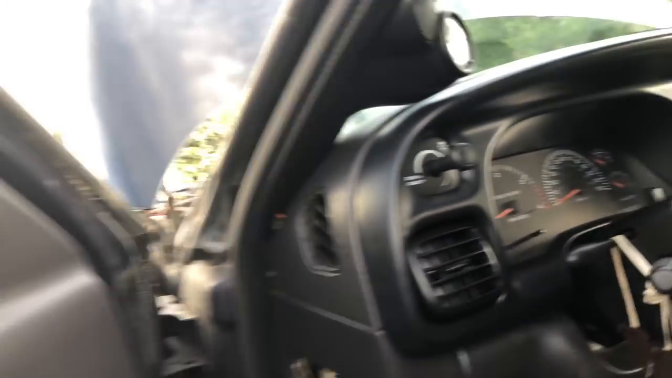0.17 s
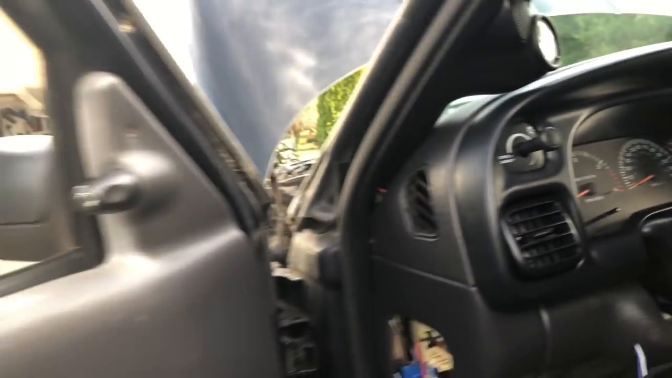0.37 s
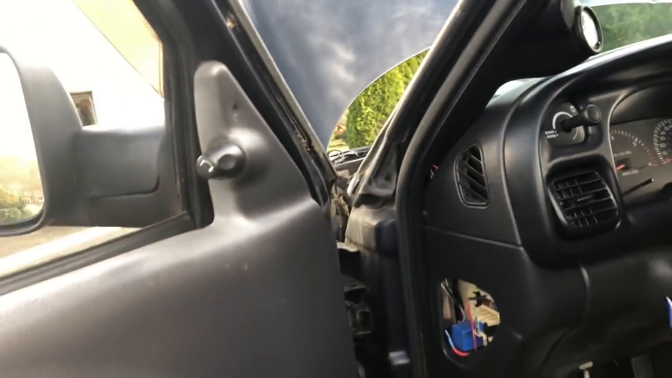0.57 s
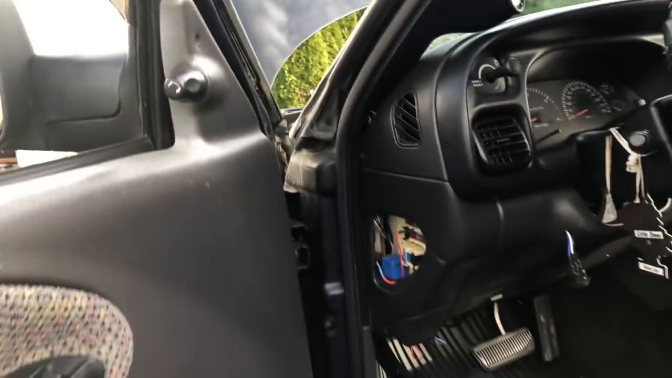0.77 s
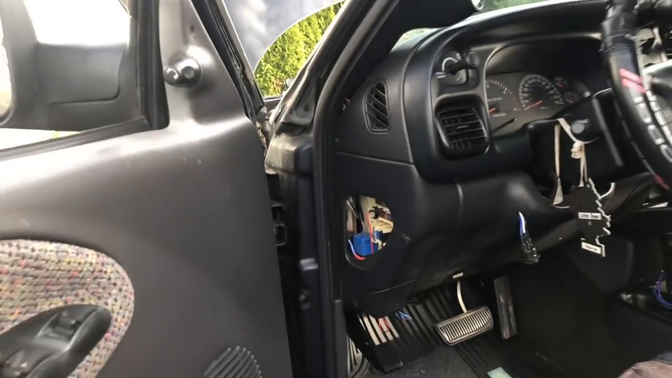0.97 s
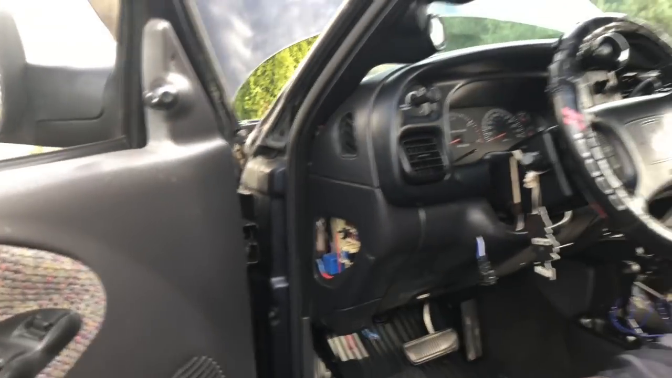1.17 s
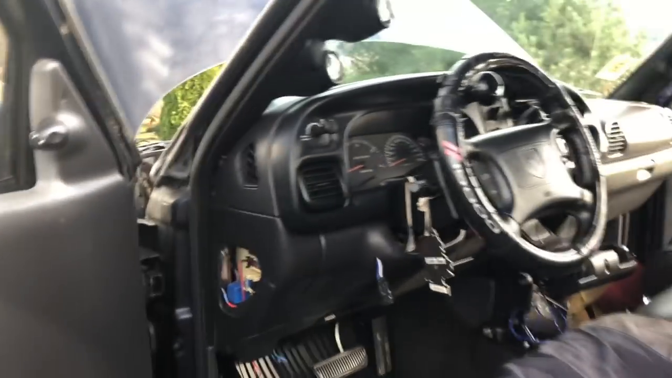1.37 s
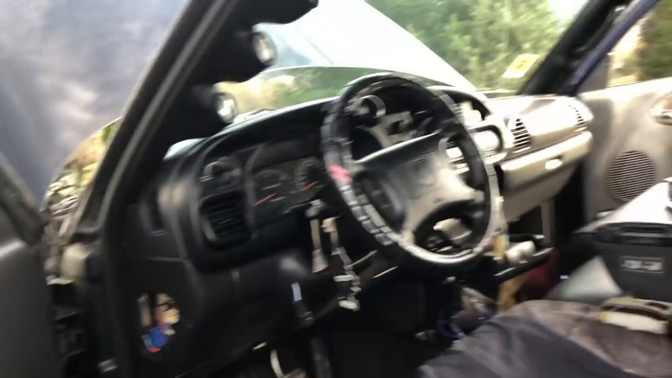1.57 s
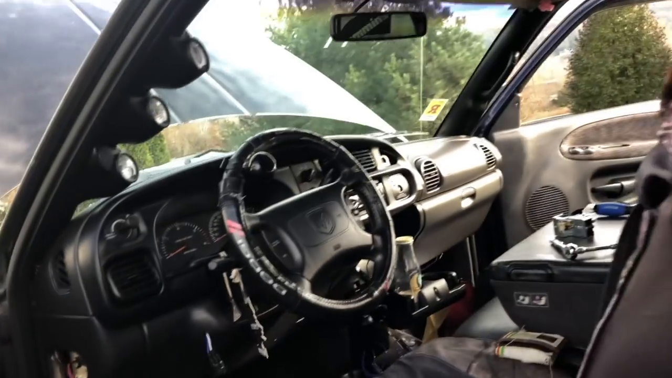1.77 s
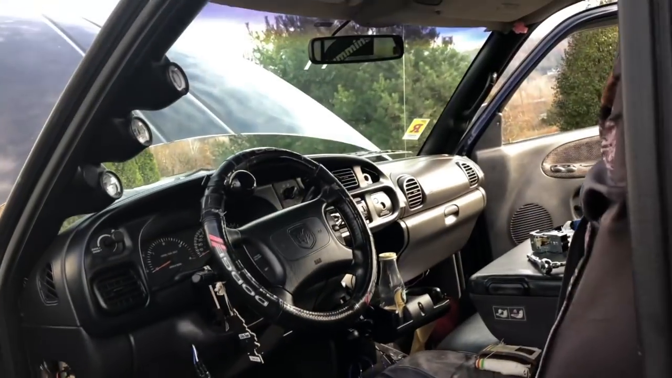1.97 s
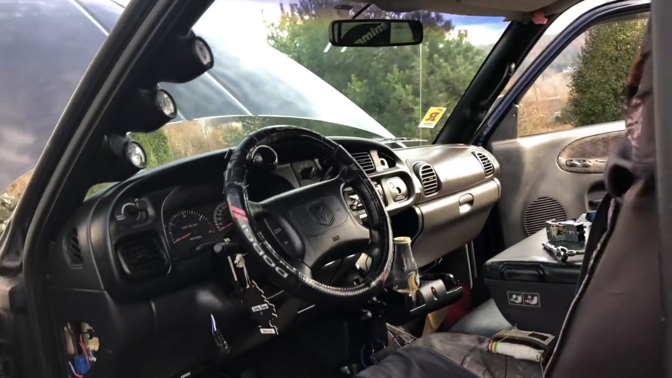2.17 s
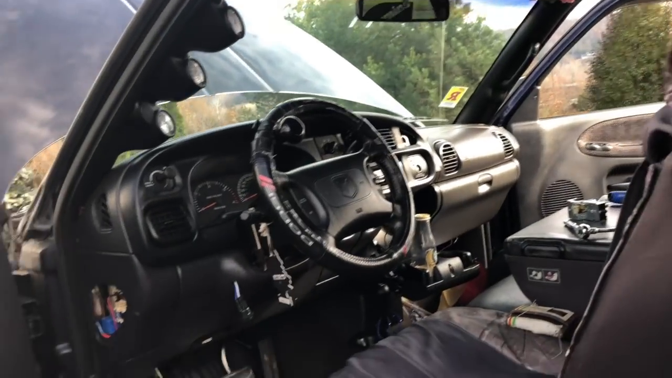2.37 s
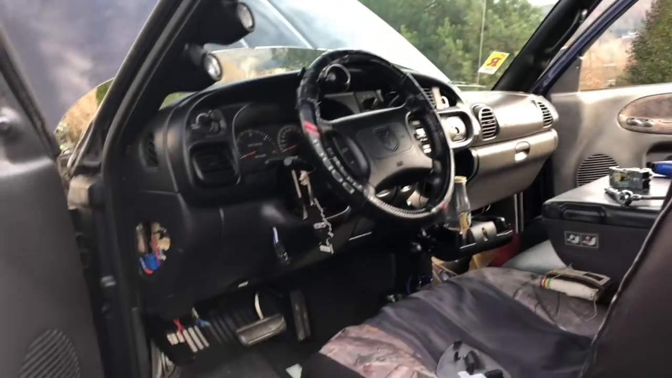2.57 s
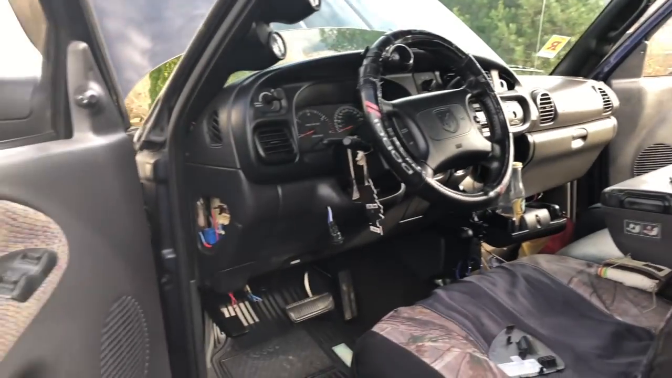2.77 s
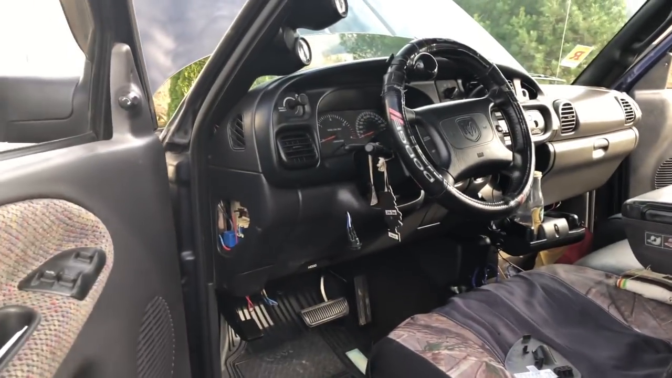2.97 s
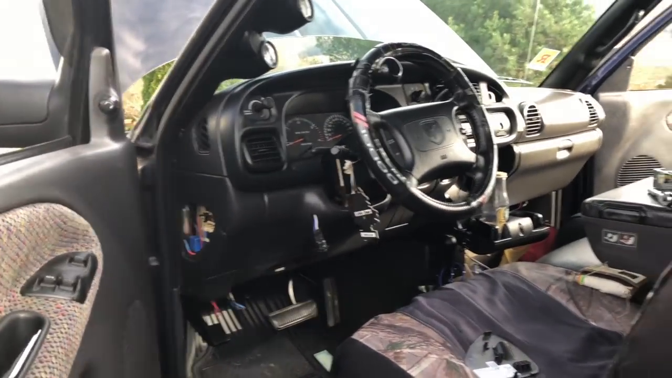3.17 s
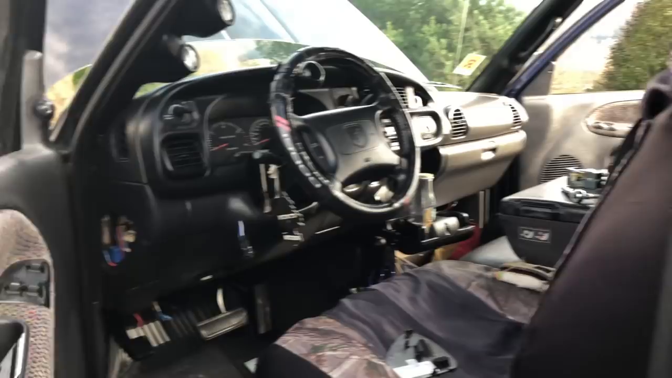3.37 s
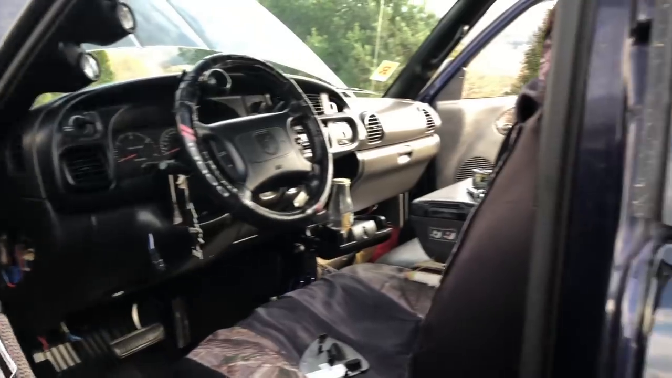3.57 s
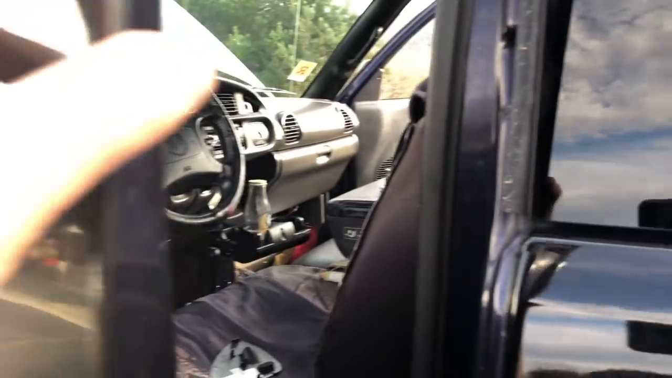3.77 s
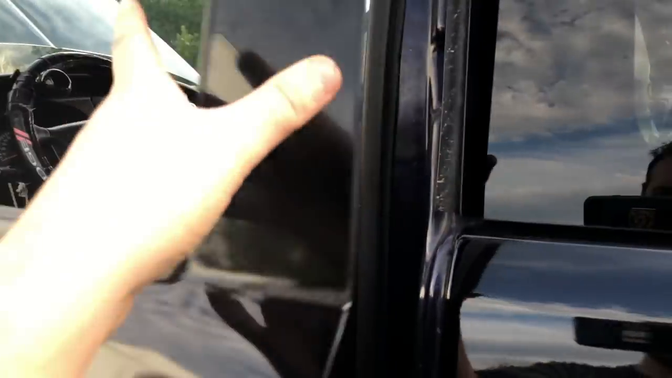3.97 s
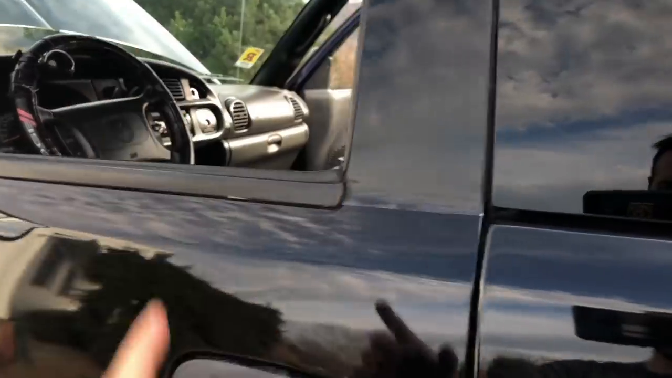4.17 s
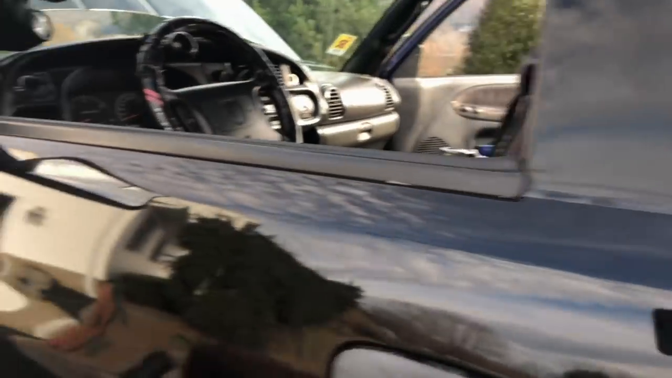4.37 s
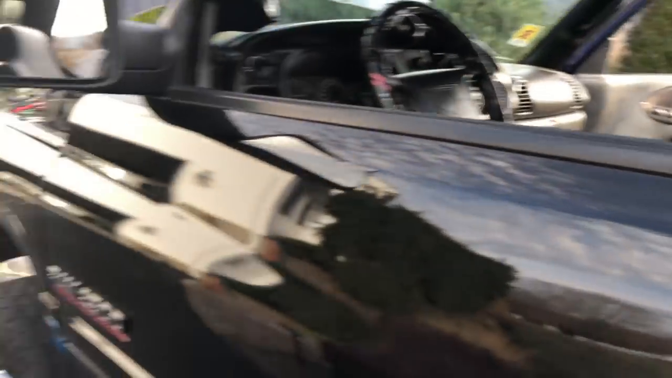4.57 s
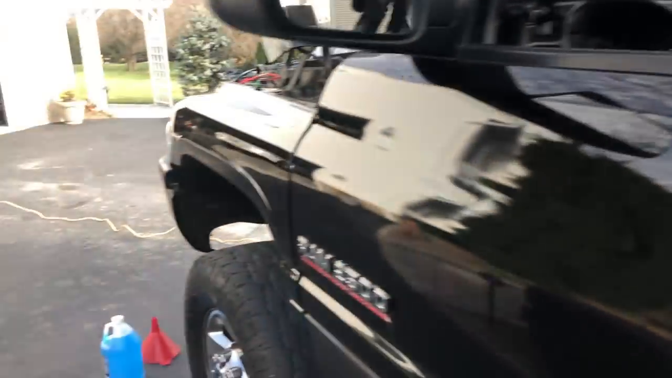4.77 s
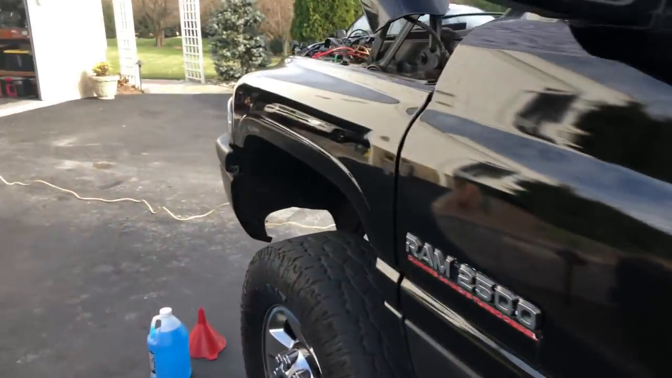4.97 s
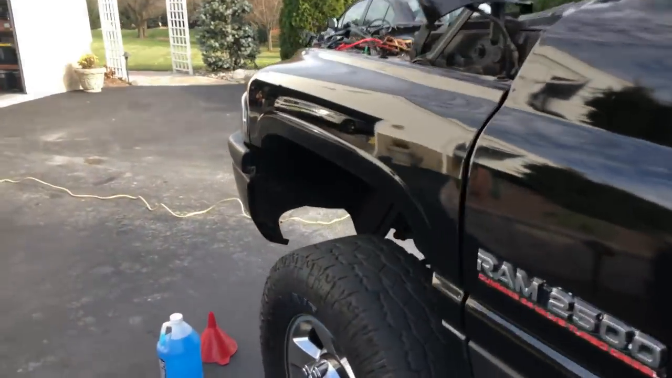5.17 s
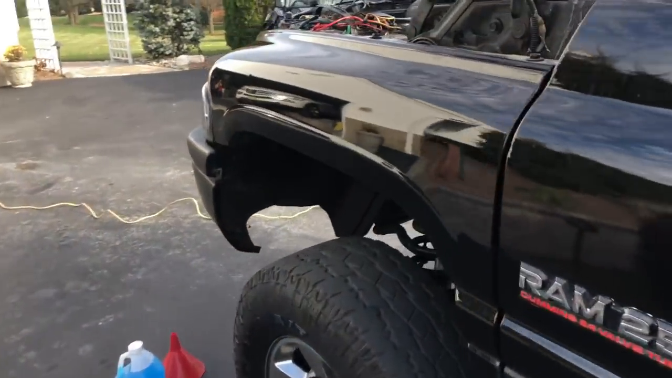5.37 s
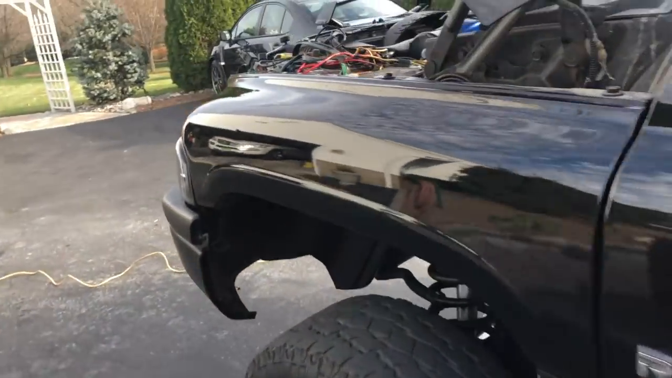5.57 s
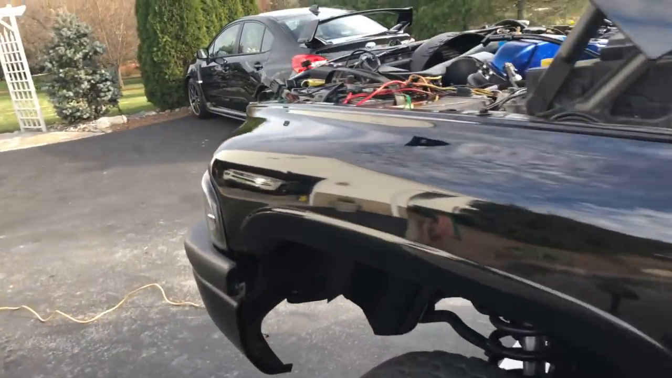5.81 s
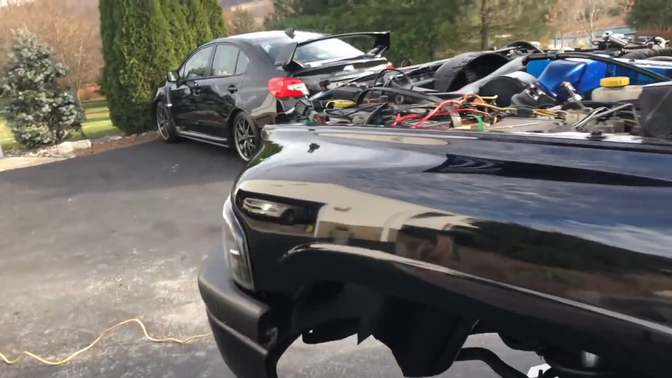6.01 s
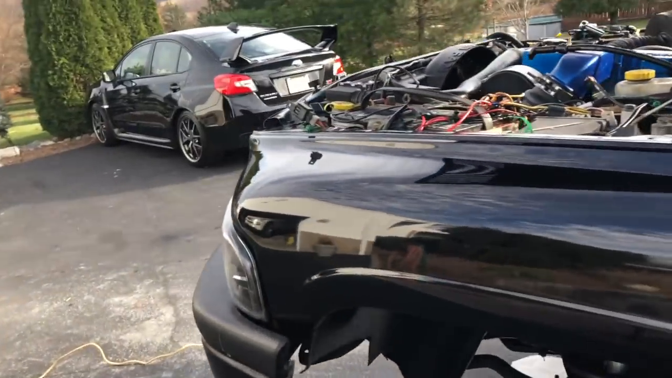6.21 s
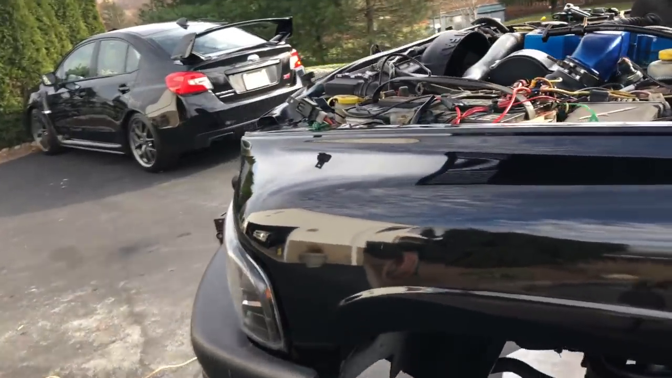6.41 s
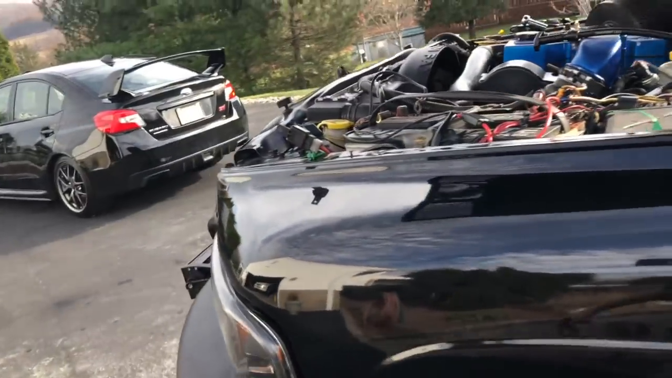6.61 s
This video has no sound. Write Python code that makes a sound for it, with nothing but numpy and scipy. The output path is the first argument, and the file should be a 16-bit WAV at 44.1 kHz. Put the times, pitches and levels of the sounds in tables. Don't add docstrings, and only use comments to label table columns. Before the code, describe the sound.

In a quiet yard, soft thumps, scuffs and tiny metal ticks by an open vehicle door, then one loud heavy slam and a distant motor hum.

```python
import sys
import numpy as np
from scipy import signal
from scipy.io import wavfile
from scipy.ndimage import uniform_filter1d, minimum_filter1d

SR = 44100
rng = np.random.default_rng(int(sys.argv[2]) if len(sys.argv) > 2 else 0)


def store_pcm(level_fs):
    pcm = np.round(np.clip(level_fs, -1, 1) * 32767).astype(np.int16)
    wavfile.write(sys.argv[1], SR, np.atleast_2d(pcm).T)


def boost(x):
    u = np.asarray(x, float) / 20
    return 10 ** u


N = 293132
SHUT_S = 4.188
SLAM_FIRST, SLAM_SIZE = round(4.1 * SR), round(.6 * SR)
SLAM = slice(SLAM_FIRST, SLAM_FIRST + SLAM_SIZE)


def rms_one(x):
    return x / np.sqrt(np.mean(x ** 2) + 1e-20)


def in_time(rows, outside=None):
    s, *columns = np.transpose(rows)
    return [np.interp(np.arange(N) / SR, s, c, outside, outside) for c in columns]


def drift(rate):
    r = np.exp(-80 * np.pi * rate / SR)
    slow = signal.lfilter([1], [1, -2 * r, r * r], rng.standard_normal(N // 40 + 2002))[2000:]
    return np.interp(np.arange(N) / 40, np.arange(len(slow)), rms_one(slow))


def resonate(x, hz, width_hz):
    r = np.exp(-np.pi * width_hz / SR)
    top = np.array([1, 0, -1]) * (1 - r * r) / 2
    return signal.lfilter(top, [1, -2 * r * np.cos(2 * np.pi * hz / SR), r * r], x)


def colour(pair, spectrum, patchy_db=0.):
    hz, level_db = np.transpose(spectrum)
    edges = hz[0] * 2 ** np.arange(0, np.log2(hz[-1] / hz[0]) + .4, .5)
    out = 0
    for k, (low, high) in enumerate(zip(edges, np.minimum(edges[1:], .45 * SR))):
        band = signal.sosfilt(signal.butter(2, [low, high], "band", fs=SR, output="sos"), pair[k % 2])
        flicker = patchy_db * drift(14)[:pair.shape[1]] if patchy_db else 0
        middle_db = np.interp(np.log(low * high) / 2, np.log(hz), level_db)
        out = out + boost(middle_db + flicker) * band
    return rms_one(out)


def grains(size, per_s, spread_db):
    strength = boost(spread_db * np.minimum(rng.exponential(1, (2, size)), 4))
    strength = strength * rng.choice([-1, 1], (2, size))
    return strength * (rng.random((2, size)) < per_s / SR) + 1e-18


def add(out, s, db, x):
    i = round(s * SR)
    x = x[:N - i]
    out[i:i + len(x)] += boost(db) * x / np.max(np.abs(x))


def glide(from_hz, to_hz, size):
    return np.sin(2 * np.pi * np.cumsum(np.linspace(from_hz, to_hz, size)) / SR)


def humps(rows, rest_db):
    t = np.arange(N) / SR
    peaks = [db - 20 * np.abs(t - s) / fall_s for s, db, fall_s in rows]
    return np.max([t * 0 + rest_db] + peaks, axis=0)


def blow_shape(s, db, rise_s, hold_s, fall_db_s):
    age = np.arange(N) / SR - s
    level_db = db - 12 * np.clip(1 - age / rise_s, 0, 1) - fall_db_s * np.maximum(age - rise_s - hold_s, 0)
    return boost(level_db) * (age > 0)


def burst(t60, rise_s):
    t = np.arange(SR // 6) / SR
    return rng.standard_normal(len(t)) * boost(-60 * t / max(t60, .004)) * (1 - np.exp(-t / rise_s))


def ring(t60, rise_s, hz, width_hz, outer_width_hz):
    return resonate(resonate(burst(t60, rise_s), hz, width_hz), hz, outer_width_hz)


def rings(rows):
    out = np.zeros(N)
    for s, db, hz, width_hz, t60 in rows:
        add(out, s, db, ring(t60, 0.00054, hz, width_hz, 2 * width_hz))
    return out


def knocks(rows, contact_s, upper_db, push_db):
    out, t = np.zeros(N), np.arange(SR // 4) / SR
    chance = rng.random((len(rows), 4))
    for (s, db, hz, t60), ratios in zip(rows, chance):
        modes = np.sin(2 * np.pi * hz * t) * boost(-60 * t / t60)
        modes += boost(push_db) * np.sin(2 * np.pi * .55 * hz * t) * boost(-70 * t / t60)
        for k, share in enumerate(ratios):
            ratio = 1.3 + .5 * k + .4 * share
            upper = np.sin(2 * np.pi * hz * ratio * t) * boost(-60 * t * ratio / t60)
            modes += boost(upper_db * (k + 1.5)) * upper
        add(out, s, db, modes * (1 - np.exp(-t / contact_s)))
    return out


def hard_ticks(rows, t60):
    out = np.zeros(N)
    for s, db, hz, body_db, snap_db in rows:
        body = resonate(resonate(burst(1.515 * t60, 0.00043), 582, 520), 726, 620)
        snap = resonate(resonate(burst(0.793 * t60, 0.00036), 3300, 5700), 4100, 10000)
        add(out, s, db, ring(t60, 0.00024, hz, 0.269 * hz, 1.38 * hz))
        add(out, s, db + body_db, body)
        add(out, s, db + snap_db, snap)
    return out


# frequency in Hz, density in dB per Hz.
RUMBLE = [(15, -44), (25, -26), (49, -8), (123, 0.5), (170, -5), (211, -14), (248, -13), (277, -27),
          (500, -28), (650, -46.5), (1100, -120)]
# frequency in Hz, density in dB per Hz.
HISS = [(150, -39), (250, -5), (325, -15), (386, -7), (686, -16.5), (761, -13), (1470, -19.5),
        (6700, -37.5), (15200, -46.5), (16000, -45)]
# time in seconds, wind on the port in dB, seconds to fall 20 dB.
SWINGS = [(0.25, -49, 0.27), (0.63, -48.5, 0.01), (1.28, -49, 0.37), (1.44, -46, 0.3862), (1.7, -58, 0.47),
          (2.0, -54.5, 0.59), (2.24, -52.5, 0.44), (2.58, -59.5, 0.12), (2.9, -53.5, 0.73),
          (3.66, -62.5, 1), (4.08, -63, 0.48), (5.0, -63, 0.73), (6.3, -63, 3.0)]
# time in seconds, lift in dB, seconds to fall 20 dB.
STIRS = [
    (0.6, 3, 1.5),
    (1.55, 2.5, 3.5),
    (3.3, 2.5, 2),
    (4.1, 3, 1.5),
    (5.55, 2.5, 3.5),
    (6.1, 2, 3.5),
]


def yard():
    calm_db, rumble_db, hiss_db = -69, -63.5, -69
    rumble_follows, hiss_follows = .2, 0.0275
    wind_db = humps(SWINGS, calm_db)
    lift_db = wind_db - calm_db
    stir_db = humps(STIRS, 0)
    echo = blow_shape(SHUT_S, db=-47, rise_s=.17, hold_s=0, fall_db_s=68.5)
    push = blow_shape(SHUT_S, db=-39, rise_s=.012, hold_s=.09, fall_db_s=65)
    rumble = colour(rng.standard_normal((2, N)), RUMBLE, patchy_db=3.0)
    hiss = colour(rng.standard_normal((2, N)), HISS, patchy_db=1.5)
    wind = rms_one(resonate(resonate(rng.standard_normal(N), 52, 40), 52, 40))
    rumble_gain = boost(rumble_db + rumble_follows * lift_db) + echo
    hiss_gain = boost(hiss_db + hiss_follows * lift_db + stir_db) + boost(-18) * echo
    wind_gain = (boost(wind_db) + push) * boost(2.0 * drift(6))
    return boost(9) * rumble_gain * rumble + boost(4.5) * hiss_gain * hiss + wind_gain * wind


# time in seconds, motor in dB, fan in dB.
MOTOR = [(0.0, -57, -61), (0.53, -77, -70), (1.0, -62, -58.5), (1.41, -67, -61.5), (2.26, -66, -57.5),
         (2.54, -62.5, -52.5), (2.92, -67, -70), (3.2, -77, -79), (4.0, -61.5, -62), (4.4, -65.5, -50.5),
         (4.75, -64, -74.5), (5.0, -52, -54), (5.14, -50.5, -53.5), (5.5, -44.5, -49), (5.83, -47, -47.5),
         (6.09, -48.5, -54.5), (6.5, -45, -54), (6.65, -49, -53)]
# time in seconds, level in dB, seconds to fall 20 dB.
DRONES = [
    (1.0, -57.5, 0.43),
    (1.83, -66.5, 0.2),
    (3.25, -59.5, 1.03),
    (3.9, -63, 1),
    (4.5, -54.5, .6),
    (5.14, -53, 0.8547),
    (5.83, -52.5, 0.72),
    (6.4, -62.5, 0.5),
]


def motor():
    shaft_hz, fan_hz, third_order_db = 96.97, 126.72, -15
    shaft_db, fan_db = in_time(MOTOR)
    second_db = humps(DRONES, -79)
    turn = 2 * np.pi * np.cumsum(shaft_hz * (1 + .003 * drift(3))) / SR
    blade = 2 * np.pi * np.cumsum(fan_hz * (1 + 0.013 * drift(4))) / SR
    shaft = boost(shaft_db + 1.2 * drift(5)) * np.sin(turn)
    orders = np.sin(2 * turn) + boost(third_order_db) * np.sin(3 * turn)
    orders = boost(second_db + .8 * drift(5)) * orders
    fan = boost(fan_db + 1.0 * drift(7)) * np.sin(blade)
    return np.sqrt(2) * (shaft + orders + fan)


# frequency in Hz, width in Hz, level in dB against the shaft.
HOUSING = [(79, 4, -15), (158.4, 4, -21), (211, 5, -21), (252, 5, -26)]


def housing():
    shaft_db, _ = in_time(MOTOR)
    hum = 0
    for hz, width_hz, db in HOUSING:
        band = resonate(resonate(rng.standard_normal(N), hz, width_hz), hz, width_hz)
        hum = hum + boost(db) * rms_one(band)
    return boost(shaft_db) * hum


# start in seconds, peak in
# dB, pitch in Hz, t60 in seconds.
BUMPS = [
    (0.2965, -41, 200, .05),
    (1.2575, -41, 560, .04),
    (1.456, -49, 450, .08),
    (3.076, -41, 400, .14),
    (4.2585, -9, 235, .05),
    (4.1885, -18, 640, .03),
    (5.478, -56, 900, .04),
    (0.229, -33, 125, .12),
    (3.436, -43, 232, .35),
    (4.2775, -11, 195, .07),
]


def bumps():
    return knocks(BUMPS, contact_s=0.0012, upper_db=-16, push_db=-9)


# start in seconds, peak in dB, pitch in Hz, t60 in seconds.
THUMPS = [(0.2395, -36, 189, 0.08), (0.599, -39, 83.8, 0.128), (1.163, -42, 124.7, 0.118),
          (1.218, -45, 170.5, 0.13), (1.262, -29, 128, 0.11), (1.392, -40, 125.7, 0.12),
          (1.4025, -28.5, 158, 0.13), (2.049, -44, 116.6, 0.263), (2.141, -37, 119.2, 0.095),
          (2.698, -47, 157.6, 0.12), (2.998, -39, 254, 0.099), (3.021, -33, 230.8, 0.24),
          (3.0575, -27, 237, 0.1), (3.216, -39, 241.3, 0.102), (3.301, -47.5, 145, 0.15),
          (3.339, -42.5, 297.2, 0.155), (3.44, -48, 230, 0.15), (3.47, -47, 239.6, 0.182),
          (3.499, -49.5, 245.7, 0.14)]


def thumps():
    return knocks(THUMPS, contact_s=0.00341, upper_db=-2, push_db=-8.5)


# start, hardest point and end in seconds, level in dB,
# brightness in dB a band.
SCUFFS = [(0.403, .445, 0.497, -68.5, 2), (0.473, 0.481, 0.549, -69.5, 2),
          (0.49, 0.523, 0.586, -64.5, -2.5), (0.588, .63, 0.67, -72, 4.5),
          (0.762, 0.782, 0.82, -60.5, -2.5), (1.747, 1.81, 1.87, -71, -12.5),
          (1.843, 1.886, 1.931, -61.5, -7.5), (3.282, 3.341, 3.25, -72, -9.5),
          (3.404, 3.501, 3.62, -74, -3.5), (4.62, 4.731, 5.0, -79.5, 5), (5.84, 5.847, 5.93, -77.5, 3),
          (5.882, 5.893, 5.975, -60, 3), (5.98, 6.1, 6.36, -77.5, 3.5), (5.1, 5.2, 5.34, -86, 3),
          (6.444, 6.467, 6.48, -68, 3.5), (6.52, 6.58, 6.68, -75, 0.5)]
# frequency in Hz, width in Hz.
SOLE = [(700, 690), (2500, 1380), (5800, 3330), (11500, 12000)]
SOLE_DB = [-0.5, -0.5, -3, -4.5]


def scuffs():
    edge_db, end_db, lift_off_s = -10, -14.5, .018
    grit_grains = grains(N, 7000, 3.9) * boost(1.68 * drift(32))
    bands = []
    for k, (hz, width) in enumerate(SOLE):
        bands.append(rms_one(resonate(resonate(grit_grains[k % 2], hz, width), hz, 1.71 * width)))
    out = 0
    for start, top, end, db, bright_db in SCUFFS:
        stroke = [(start, edge_db), (top, 0), (end, end_db), (end + lift_off_s, 2 * end_db - 10.5)]
        stroke_db, = in_time(stroke, outside=-130)
        rub = sum(boost((k - 1) * bright_db + SOLE_DB[k]) * band for k, band in enumerate(bands))
        out = out + boost(db + stroke_db) * rub
    return out


# start in seconds, peak
# in dB, ring in Hz, width in Hz, t60 in seconds.
KEYS = [(0.4093, -59.5, 5140, 1500, .03), (0.4095, -66, 11000, 6000, 0.029),
        (0.4253, -61.5, 4660, 400, 0.051), (0.4422, -59, 7500, 700, 0.078), (0.47, -61.5, 5610, 250, 0.098),
        (0.4772, -60.5, 5770, 400, 0.124), (0.4772, -59, 8000, 600, .08),
        (0.4772, -62.5, 10560, 500, 0.048), (0.478, -65, 12250, 500, .14), (0.4775, -64.5, 4300, 400, .05),
        (0.5051, -57.5, 3340, 1200, 0.059), (0.506, -57, 1700, 900, .1), (0.53, -60, 1900, 900, .08),
        (0.5715, -44, 12000, 7000, .018), (0.578, -36.5, 13000, 6000, .022),
        (0.586, -35.5, 12500, 7000, 0.0205)]


def keys():
    return rings(KEYS)


# start in seconds, peak in dB, ring in Hz,
# dull body and bright snap in dB against the peak.
TICKS = [(0.5713, -33.5, 1590, -8.5, -2.5), (0.5779, -29.5, 1500, -11.5, 3), (0.5865, -29, 1500, -14, -2.5),
         (0.7706, -51.5, 1430, -7, -18.5), (0.7869, -44.5, 1400, -6, -19.5), (1.2595, -80, 1000, 20, -15),
         (1.4024, -70, 1500, 6, -16), (1.5945, -55.5, 1550, 3.5, -2.5), (1.6639, -50.5, 1280, -3.5, -5),
         (1.8545, -54, 2450, -10, -25.5), (1.883, -53, 2600, -11, -26), (1.923, -50, 2260, -14.5, -18),
         (2.061, -43.5, 1980, -8.5, -9), (2.55, -61.5, 1580, -0.5, -9.5), (3.012, -69.5, 1520, 12.5, -19.5),
         (3.057, -37.5, 1570, -2.5, -37), (3.0714, -49, 1320, 3.5, -29), (3.2142, -50.5, 1250, 7, -34),
         (3.3336, -64.5, 1390, 12, -16.5), (3.451, -58, 1200, -0.5, -18), (3.52, -54.5, 1300, -14.5, -14.5)]


def ticks():
    return hard_ticks(TICKS, t60=0.0325)


# start in seconds, peak in dB, ring in Hz, width in Hz,
# t60 in seconds.
CREAKS = [(0.6, -47.5, 397, 250, 0.108), (1.7943, -55.5, 1000, 500, .05), (1.819, -56.5, 900, 700, .025),
          (1.833, -57, 600, 400, 0.029), (1.855, -56.5, 950, 400, .04), (1.872, -57.5, 1000, 500, 0.048),
          (1.891, -55, 950, 300, .05), (1.945, -60.5, 800, 400, .04), (3.013, -45, 600, 400, 0.061),
          (3.021, -56.5, 1100, 250, .04), (3.075, -44.5, 550, 450, 0.18), (3.09, -59, 1500, 900, 0.15),
          (3.222, -51, 1150, 400, 0.086), (3.225, -50, 450, 300, 0.128), (3.303, -54, 1045, 250, .08),
          (3.303, -58, 1600, 600, 0.068), (3.336, -58.5, 2800, 400, .03), (3.338, -50.5, 523, 300, 0.127),
          (3.347, -56, 1000, 300, 0.081), (3.367, -52, 425, 250, .08), (3.404, -57.5, 800, 500, 0.09),
          (3.515, -58, 1400, 400, .08)]


def creaks():
    return rings(CREAKS)


# start and end in seconds, start and end pitch in Hz, level in dB.
SKIDS = [
    (1.845, 1.878, 2100, 3000, -53),
    (1.876, 1.915, 2400, 2150, -47.5),
    (1.85, 1.9, 5600, 5200, -62.5),
]


def skids():
    width_hz = 210
    out = np.zeros(N)
    for start, end, from_hz, to_hz, db in SKIDS:
        size = round((end - start) * SR)
        rough = resonate(rng.standard_normal(SR // 10), width_hz / 2, width_hz)[-size:]
        add(out, start, db, rough * glide(from_hz, to_hz, size) * np.hanning(size) ** 0.37)
    return out


# start and end in seconds, start and end pitch in Hz, level in dB.
SQUEAKS = [
    (1.88, 1.915, 2650, 2300, -66),
    (2.33, 2.75, 161, 158, -54),
    (4.57, 4.67, 1385, 1445, -64),
    (5.84, 6.2, 1222, 1212, -65),
    (4.325, 4.36, 13050, 12950, -48),
]


def squeaks():
    out = np.zeros(N)
    for start, end, from_hz, to_hz, db in SQUEAKS:
        size = round((end - start) * SR)
        swell = np.hanning(size) ** 0.27 * boost(1.22 * drift(25.2)[:size])
        add(out, start, db, glide(from_hz, to_hz, size) * swell)
    return out


# start in seconds, peak in dB,
# ring in Hz, width in Hz, t60 in seconds.
FLICKS = [(3.0585, -43, 2300, 700, .03), (3.0745, -52, 2300, 600, .04), (3.451, -65, 6300, 1500, .04),
          (3.505, -67, 5200, 2500, .1), (3.95, -66, 3500, 2500, .1), (4.02, -68, 6500, 3000, .06),
          (4.133, -45, 2800, 1800, .04), (4.176, -60, 5000, 5000, .05), (5.842, -62, 5800, 500, .06),
          (5.888, -51, 4200, 500, .05), (5.913, -55, 1300, 900, .04), (6.466, -58, 4600, 1200, .03),
          (5.29, -70, 12000, 5000, .02), (5.546, -62, 6500, 3000, .035), (4.262, -36, 12000, 6000, .35)]


def flicks():
    return rings(FLICKS)


# start in seconds, peak in dB, ring in Hz,
# dull body and bright snap in dB against the peak.
GRIT = [(3.95, -62, 1210, -1.5, 0.5), (4.03, -66, 1290, -2.5, 2.5), (4.856, -54, 1510, 12, -13.5),
        (5.4264, -51, 2040, 6, -10), (5.4694, -55.5, 1366, -7, -21), (5.545, -59.5, 1381, -5, 3.5),
        (5.8414, -63, 1219, -0.5, 3.5), (5.884, -40, 3536, -1.5, 2.5), (6.008, -37.5, 1820, 0, -14),
        (6.0217, -54, 1210, -1, -14.5), (6.4461, -46.5, 2530, -6, -6.5), (6.4653, -47.5, 2660, -5, -3)]


def grit():
    return hard_ticks(GRIT, t60=0.0429)


# start in seconds, peak in dB, t60 in seconds, ring in Hz,
# ring in dB against the peak.
LATCH = [(4.129, -45, 0.05, 5090, -5.5), (4.1905, -18.5, 0.0415, 3310, -0.5),
         (4.1994, -6, 0.0343, 3380, 0.5), (4.2052, -20, 0.04, 3560, -5), (4.2122, -13.5, 0.024, 3400, -2.5),
         (4.2185, -11, 0.0387, 3370, -2), (4.2556, -9.5, 0.048, 3300, -6), (4.2592, -19, 0.058, 2820, 2),
         (4.2973, -22, 0.044, 2610, -5), (4.344, -31, 0.039, 2570, -5), (4.3686, -46, 0.032, 2820, 1.5),
         (4.384, -33, 0.044, 3450, -0.5), (4.423, -46, 0.038, 6000, -3.5),
         (4.459, -45.5, 0.043, 4230, -2.5), (4.482, -39, 0.043, 2930, -6.5),
         (4.5131, -45.5, 0.033, 2890, -2), (4.5544, -61, 0.042, 2510, -4), (4.5664, -58.5, 0.038, 2790, -4),
         (4.5943, -59.5, 0.04, 4040, -5.5)]
# start in seconds, level in dB, fall in dB per second.
RATTLES = [
    (4.2, -12, 519),
    (4.257, -24.5, 125),
    (4.435, -53.5, 131.5),
]
# frequency in Hz, density in dB per Hz.
METAL = [(530, -34), (900, -3.5), (1720, -6.5), (2220, -11), (2660, -9), (3000, -13), (3340, -13),
         (4520, -6.5), (6410, -13), (16000, -26)]


def latch():
    settle_s = 4.43
    out = np.zeros(N)
    t = np.arange(N) / SR
    rattle = 0
    for s, db, fall_db_s in RATTLES:
        rattle = rattle + blow_shape(s, db, 0.0026, 0, fall_db_s) * ((t < settle_s) | (s > settle_s))
    contacts = boost(-8.5) * rattle[SLAM]
    for s, db, t60, hz, ring_db in LATCH:
        add(out, s, db + ring_db - 7, ring(t60, 0.0007, hz, .16 * hz, 0.35 * hz))
        age = np.maximum(t[SLAM] - s, 0)
        contacts = contacts + boost(db - 10 - 60 * age / max(t60, .004)) * (1 - np.exp(-age / .0005))
    out[SLAM] += contacts * colour(grains(SLAM_SIZE, 6000, 3.5), METAL, patchy_db=2.0)
    return out


# start in seconds, peak in dB, ring in Hz, t60 in seconds.
TRIM = [(4.1301, -38, 1442, 0.042), (4.1414, -43, 1300, 0.081), (4.1881, -14, 1150, 0.022),
        (4.2184, -9.5, 1540, 0.0386), (4.2705, -22, 920, 0.069), (4.3192, -23, 1505, 0.064),
        (4.3302, -25, 1500, 0.048), (4.3423, -21, 1790, 0.043), (4.4006, -32, 1060, 0.072),
        (4.401, -31, 1702, 0.08), (4.4843, -44.5, 1347, 0.05), (4.5255, -50.5, 1400, 0.052)]


def trim():
    out = np.zeros(N)
    for s, db, hz, t60 in TRIM:
        add(out, s, db - 3.0, ring(t60, 0.0014, hz, 0.17 * hz, .5 * hz))
    return out


# start in seconds, peak in dB, pitch in Hz, t60 in seconds.
BLOWS = [(4.133, -32.5, 193.1, 0.153), (4.188, -10.5, 353, 0.145), (4.195, -9, 332.9, 0.167),
         (4.209, -4.5, 653.5, 0.0564), (4.219, -11, 140, 0.123), (4.236, -4, 89.3, 0.087),
         (4.26, -2, 354.5, 0.0553), (4.275, -9.5, 225, 0.035), (4.278, -1.5, 138, 0.062),
         (4.305, -33, 80.7, 0.13), (4.324, -38.5, 80, 0.077), (4.339, -22, 157.6, 0.18),
         (4.351, -15.5, 183.6, 0.179), (4.356, -21, 321.4, 0.103), (4.352, -21.5, 642.8, 0.093),
         (4.408, -23, 158.2, 0.126), (4.478, -32, 165, 0.07), (4.51, -29, 169.9, 0.118)]


def seal_blows():
    return boost(-1.0) * knocks(BLOWS, contact_s=0.00086, upper_db=-2.5, push_db=-15)


# start in seconds, peak in dB, ring in Hz, width in Hz, t60 in seconds.
CHINKS = [(4.184, -41, 3000, 4000, 0.031), (4.1925, -29, 9500, 4000, 0.028),
          (4.2125, -23, 10180, 1500, 0.019), (4.2125, -28, 15500, 900, 0.0196),
          (4.2185, -20.5, 9970, 2000, 0.0193), (4.2185, -26, 15500, 900, .025),
          (4.2552, -21.5, 9940, 1500, 0.0246), (4.271, -22, 2000, 1000, 0.0144),
          (4.322, -37, 6500, 900, .03), (4.3427, -33, 4650, 600, 0.036), (4.345, -39.5, 8500, 1500, 0.027),
          (4.369, -42.5, 15000, 1500, .04), (4.37, -43, 5500, 1500, 0.027), (4.3836, -38, 6480, 900, 0.027),
          (4.385, -46, 9550, 1200, 0.029), (4.42, -43.5, 6020, 600, 0.042), (4.421, -48, 7770, 500, 0.047),
          (4.4589, -51.5, 4190, 250, .16), (4.466, -55.5, 15000, 1200, .04),
          (4.466, -56.5, 10500, 1500, 0.059), (4.478, -54.5, 14800, 1500, 0.028),
          (4.4824, -42, 5560, 1500, 0.018), (4.4824, -58, 7800, 400, 0.061), (4.49, -50, 3505, 400, 0.057),
          (4.5128, -54.5, 6090, 600, 0.0355)]


def chinks():
    return rings(CHINKS)


# frequency in Hz, width in Hz, level in dB.
PANEL = [(91.7, 17, 3), (140, 42, 1.5), (237, 56, -3.5), (353, 14, -0.5), (379.9, 18, -1.5), (475, 14, 0),
         (566, 15, -17), (634.7, 18, -6.5), (779, 40, -9), (817.4, 7.7, -10), (1012, 18, -12),
         (1150, 15, -15), (1400, 22, -13), (1790, 24, -16), (2260, 34, -23), (2793, 20, -21.5)]
# frequency in Hz, density in dB per Hz.
PANEL_BED = [(32, -37), (55, -7), (92, -2), (351, -2.5), (425, -12.5), (467, -6.5), (2500, -26),
             (3250, -54.5), (5500, -120)]


def panel():
    shaken = blow_shape(SHUT_S, db=-15.5, rise_s=.014, hold_s=0.0457, fall_db_s=132)[SLAM]
    jolts = grains(SLAM_SIZE, 4000, 3.5)
    ringing = 0
    for k, (hz, width, db) in enumerate(PANEL):
        mode = rms_one(resonate(jolts[k % 2], hz, width)) * np.sqrt(width)
        ringing = ringing + (-1) ** k * boost(db) * mode
    skin = rms_one(rms_one(ringing) + .7 * colour(jolts, PANEL_BED))
    out = np.zeros(N)
    out[SLAM] = boost(-2.5) * shaken * skin
    return out


# start in seconds, peak in dB, ring in Hz, width in Hz, t60 in seconds.
SETTLING = [
    (4.222, -15, 822, 90, 0.066),
    (4.228, -19, 400, 80.1, .05),
    (4.405, -33, 633, 120, 0.085),
    (4.455, -40, 752, 400, 0.079),
    (4.51, -40.5, 419, 249.8, 0.092),
    (4.545, -39.5, 151, 90, 0.202),
    (4.63, -48, 219.6, 150, .12),
    (4.675, -45.5, 180, 149.5, 0.094),
]


def settling():
    return rings(SETTLING)


def scene():
    surroundings = yard() + motor() + housing()
    seat = bumps() + thumps() + keys() + ticks() + creaks()
    walker = scuffs() + skids() + squeaks() + flicks() + grit()
    slam = latch() + trim() + seal_blows() + chinks() + panel() + settling()
    return (surroundings + seat + walker + slam)[None]


def roll_off(x):
    return signal.sosfilt(signal.butter(12, 16810, fs=SR, output="sos"), x)


def record(dry):
    limit, release_db_s = 0.482, 303
    cutoff_hz, port_hz = 16050, 42
    over_db = np.maximum(20 * np.log10(np.abs(dry) / limit + 1e-9), 0)
    fall = release_db_s * np.arange(N) / SR
    held_db = np.maximum.accumulate(over_db + fall, axis=1) - fall
    gain = uniform_filter1d(minimum_filter1d(boost(-held_db), size=61), size=61)
    cut = signal.sosfilt(signal.ellip(10, .5, 60, cutoff_hz, fs=SR, output="sos"), dry * gain)
    cut = signal.sosfilt(signal.butter(4, port_hz, "high", fs=SR, output="sos"), cut)
    return roll_off(cut)


dry = scene()
out = record(dry)
store_pcm(out)
```